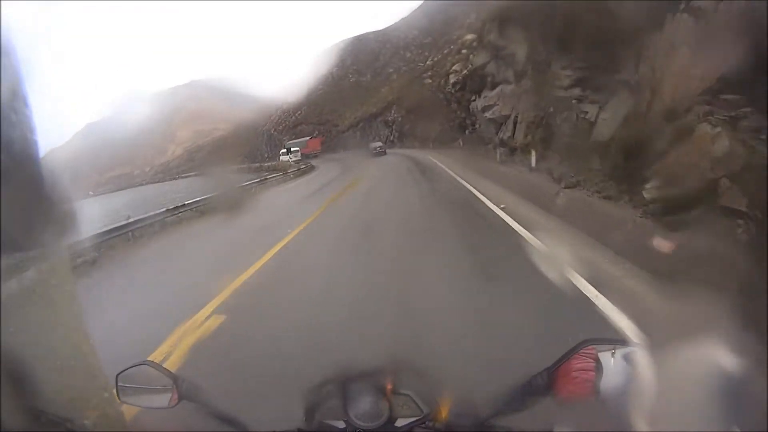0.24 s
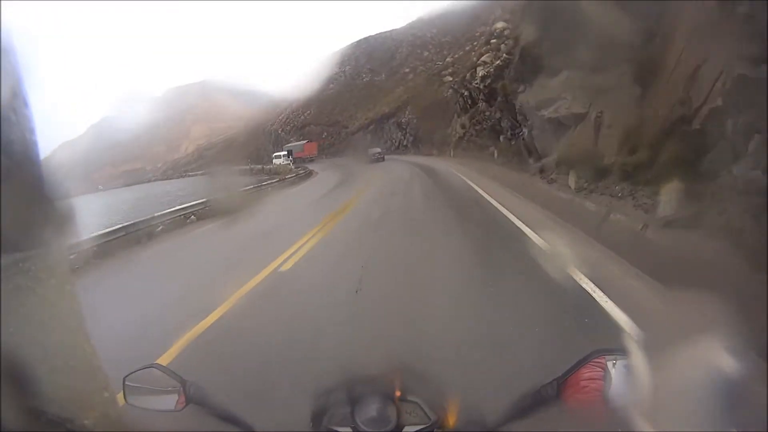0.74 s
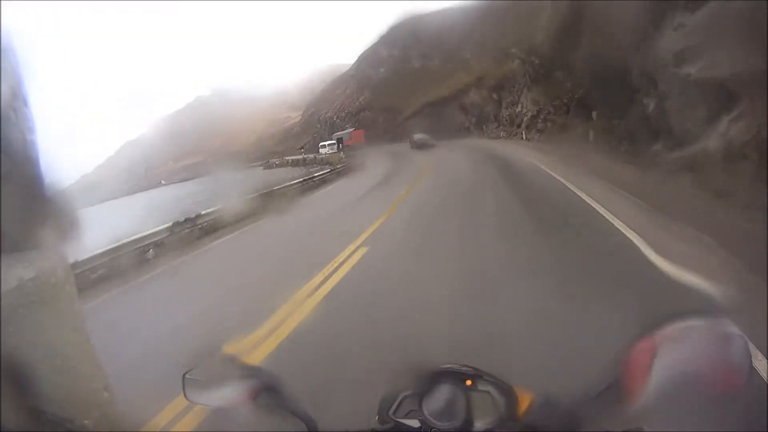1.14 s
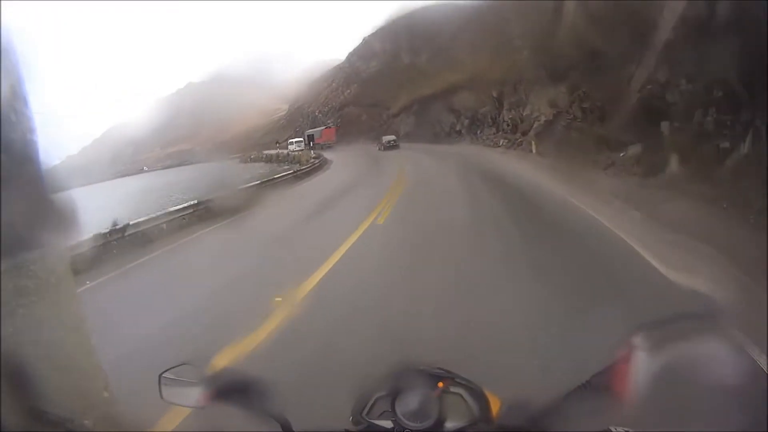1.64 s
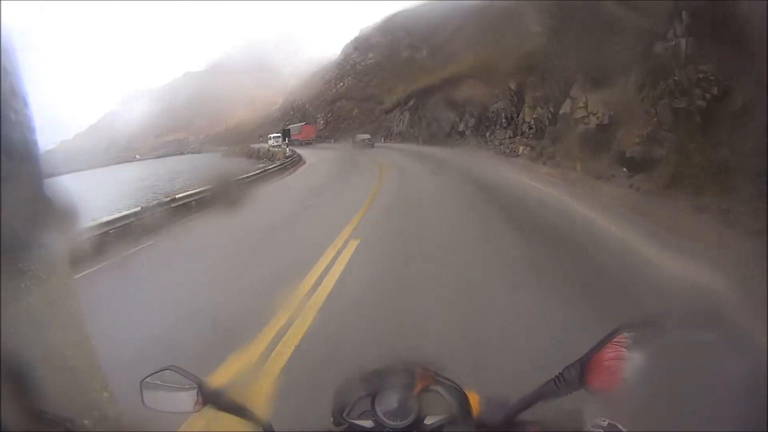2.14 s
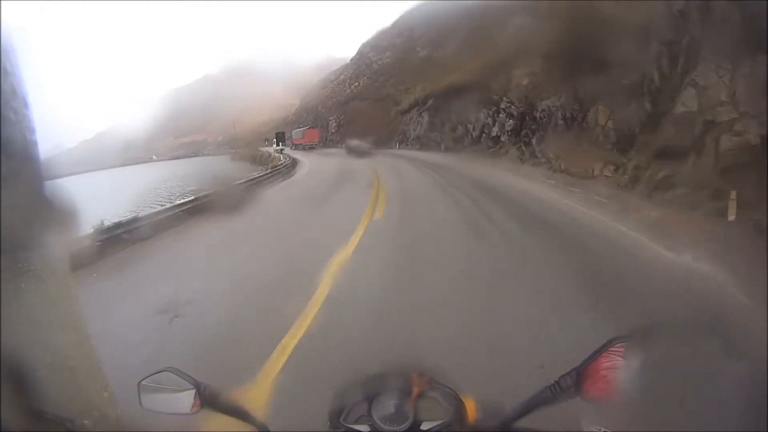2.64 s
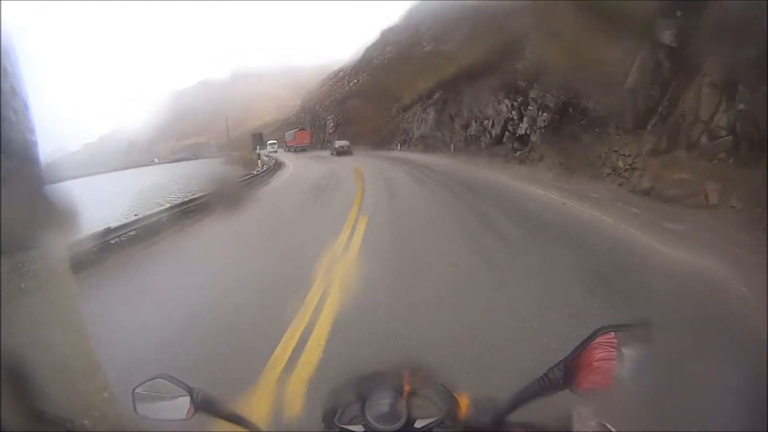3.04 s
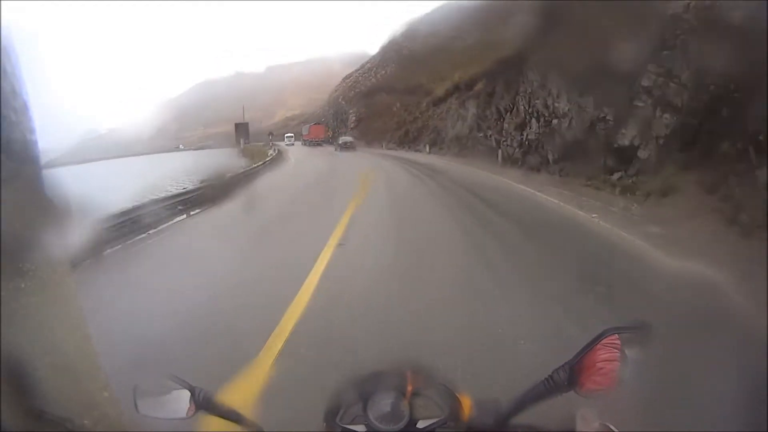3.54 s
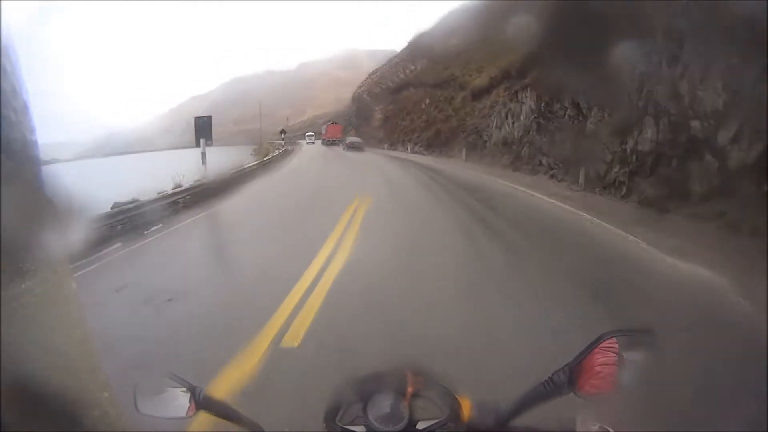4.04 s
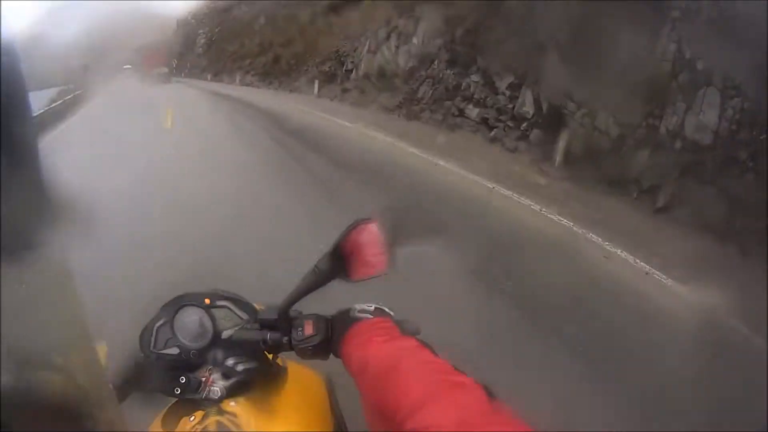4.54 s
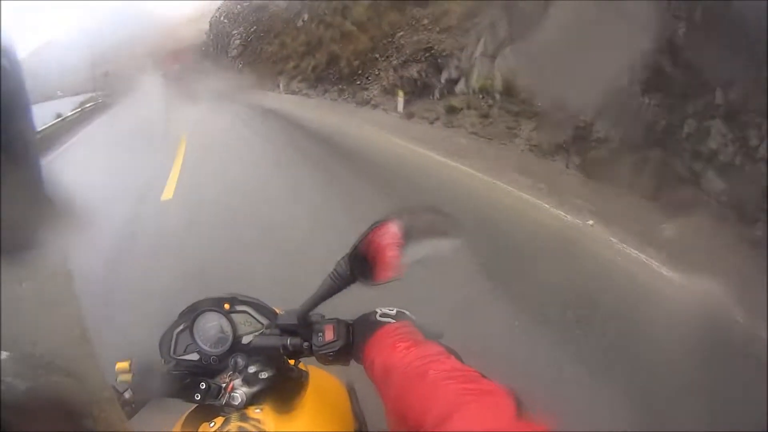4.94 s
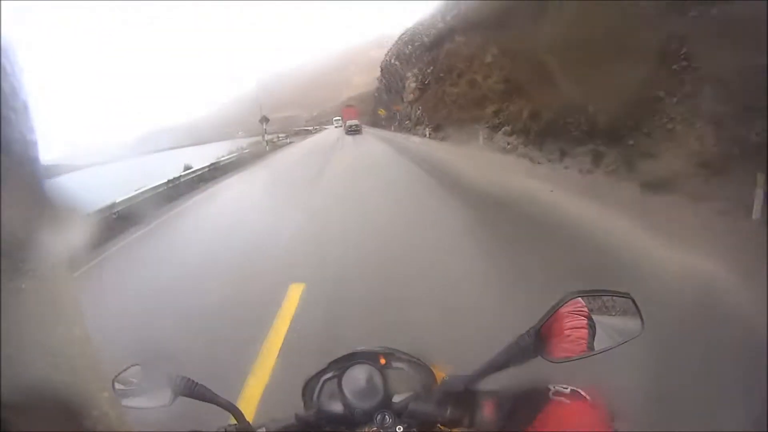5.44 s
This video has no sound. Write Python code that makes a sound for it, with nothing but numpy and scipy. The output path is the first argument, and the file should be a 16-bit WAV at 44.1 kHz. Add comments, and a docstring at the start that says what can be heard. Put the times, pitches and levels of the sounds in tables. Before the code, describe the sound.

Wind and tyre spray hiss on a motorcycle helmet while raindrops tick sharply on it, over thin whistles, low rumble and faint whine.

```python
"""On a motorcycle on a wet road; a small stereo camera sits in a closed housing on the rider's helmet.
From the start, wind and tyre spray hiss through the housing's resonances over a low rumble, air whistles
over its edges, raindrops tick on the shell and gears whine faintly. From 2.2 to 5.1 s the head tips down:
most whistles rise and the whine fades. On the way, the background dips briefly at four hard drops, and
near 4.5 s the moving head meets one buffet of wind. The head stays down to the end."""
import sys
import numpy as np
from scipy import signal
from scipy.fft import rfft, irfft, next_fast_len
from scipy.io import wavfile

SR = 44100
rng = np.random.default_rng(int(sys.argv[2]) if len(sys.argv) > 2 else 0)


def transcribe(u):
    """Save the signal u as a 16-bit wav file named by the first command-line argument.

    u: samples, shape (n,) or (channels, n), limited to [-1, 1]; the rate is SR.
    q: integer samples, one column per channel.
    """
    v = np.clip(np.atleast_2d(u).T, -1, 1)
    q = np.round(v * 32767).astype(np.int16)
    wavfile.write(sys.argv[1], SR, q)


N = 251811
TIME = np.arange(N) / SR
FFT_SIZE = next_fast_len(N)
BIN_HZ = np.arange(FFT_SIZE // 2 + 1) * SR / FFT_SIZE
SIDES = np.array([[.5], [-.5]])   # splits a left-right difference between the two microphone ports

# Airflow at the helmet, before the buffet: t/s, hiss level/dB, rumble level/dB
RIDE = [(0.0, -43, -46.5), (0.32, -43.5, -47.5), (0.68, -44, -46.5), (1.18, -43.5, -50), (2.02, -43, -49),
        (2.26, -44.5, -50), (3.44, -41.5, -49), (4.15, -42.5, -51.5), (4.61, -43, -48.5),
        (4.99, -42.5, -47), (5.36, -42, -46.5), (5.71, -42, -49.5)]
# Spectrum of wind and tyre spray outside the housing: f/Hz, relative level/dB
HISS = [(300, -25), (600, -14.5), (1000, -15), (2000, -16), (3000, -22.5), (5000, -21), (7000, -20.5),
        (9000, -32), (11500, -37)]
# Housing cavities, right around the microphones: f/Hz, width/Hz, left lift/dB, right lift/dB
CAVITY = [(884, 56, 6, 6.9), (1284, 354, 9.5, 8), (1580, 350, 6.5, 2.7), (2331, 336, 17, 9.6),
          (3306, 160, -23, 13.4), (4250, 200, 8, 7.9), (4770, 250, -35, 8.3), (7560, 380, -6, 1.8)]
# Spectrum of the wind's rumble on the housing: f/Hz, relative level/dB
RUMBLE = [(12, -33), (20, -17), (43, -10.5), (135, -0.5), (167, -2.5), (238, -1), (325, -6.5), (370, -10),
          (528, -14.5), (600, -13.5), (780, -23), (1320, -120)]
def wind(buffet_s=4.47, buffet_half_width_s=.1, buffet_hiss_db=2.0, buffet_rumble_db=4.5):
    """Wind and spray hiss through the housing's cavities over a rumble; one buffet lifts both."""
    ride_s, hiss_db, rumble_db = np.transpose(RIDE)
    buffet = np.exp(-((TIME - buffet_s) / buffet_half_width_s) ** 2)
    hiss_gain = from_db(np.interp(TIME, ride_s, hiss_db) + buffet_hiss_db * buffet)
    rumble_gain = from_db(np.interp(TIME, ride_s, rumble_db) + buffet_rumble_db * buffet)
    cavity_db = sum(np.array(db)[:, None] / (1 + (2 * (BIN_HZ - hz) / width) ** 2)
                    for hz, width, *db in CAVITY)
    hiss = gusty_noise(spectrum(HISS) + cavity_db, gust_db=1.1, gust_hz=24.0)
    rumble = gusty_noise(spectrum(RUMBLE), gust_db=-1.6, gust_hz=9.2)
    return hiss_gain * hiss + rumble_gain * rumble


# Whistles at the housing's edges: f head up/Hz, f head down/Hz, width/Hz, level head up/dB,
# level half way/dB, level head down/dB, leftward bias/relative, left lead/rad
WHISTLES = [(2605, 3660, 180, -57, -52, -50, 7.5, -1.72), (3319, 4050, 610, -66, -51.5, -45, 0.5, -1.14),
            (3833, 5400, 170, -55.5, -51, -82.5, 2, -0.91), (4620, 4620, 280, -61, -58, -52, 3, 0.39),
            (5380, 7900, 90, -72, -69, -67, 10, -1.2), (6120, 8300, 69, -65.5, -72, -62.5, 0.5, -0.083),
            (6400, 8700, 970, -75, -73, -63.5, -1, -0.95)]
def whistles():
    """Air whistles over the edges; tilt shifts pitch and level, and the rougher stream adds flutter."""
    down = tilt()
    flutter = 1 + .015 * down * slow_noise(150).real
    out = 0
    for up_hz, down_hz, width_hz, *db, bias, lead in WHISTLES:
        level_db = np.interp(down, [0, .5, 1], db) + 2.7 * slow_noise(17).real
        pan_db = bias * (2.5 - 0.95 * down)   # tipping down brings both ports into the stream
        hz = flutter * (up_hz + (down_hz - up_hz) * down)
        out = out + from_db(level_db + pan_db * SIDES) * noisy_tone(hz, width_hz, lead)
    return out


# Single drops on the shell, at very close range: t/s, level/dB, first ring f/Hz, second ring f/Hz,
# brightness/octaves above 1 kHz, spread/octaves, left minus right/dB
DROPS = [(0.0525, -23.5, 2390, 1640, 1.7, 1.6, -8.5), (0.0712, -25, 2390, 1705, 1, 1.5, -0.5),
         (0.241, -25.5, 2480, 2190, 0.3, 1.5, -2.0), (0.5314, -23.5, 1470, 2510, 0.3, 1.5, -5),
         (0.6233, -27, 1280, 1650, 0.3, 2.1, -3.0), (0.7528, -30.0, 3690, 3410, 2.8, 2.0, -1.5),
         (0.871, -24.5, 5050, 4600, 1.75, 3, -2), (0.9177, -32.0, 2380, 4400, 2.2, 2.0, 0.5),
         (0.9797, -21.5, 2360, 1620, 1.4, 1.23, -4), (1.0747, -17, 1710, 1460, 0.26, 1.7, -4.0),
         (1.451, -26.5, 4160, 4390, 0.7, 2.3, -2.0), (1.5983, -18.5, 3330, 4580, 2.26, 1.1, -8.5),
         (1.633, -25, 1370, 2260, 0.3, 2.3, -5), (1.6403, -24.5, 3770, 2320, 2.4, 1.1, 0),
         (1.6558, -24, 1340, 2340, 0.6, 1.9, -4), (1.8589, -23, 4380, 3760, 1.6, 2.6, -3.5),
         (2.161, -22.5, 1350, 2290, 0.65, 1.4, -3.0), (2.1704, -27.5, 1360, 2400, 0.6, 2.6, -2.0),
         (2.2475, -15, 1750, 2500, 0.33, 1.63, -4), (2.2685, -18.5, 2570, 3940, 1.86, 1.06, 6),
         (2.6254, -20, 2470, 1640, 0.58, 1.76, -4), (2.667, -26.5, 2290, 1380, 1.75, 1.3, -3),
         (2.7161, -17, 2540, 1686, 0.3, 1.93, -4), (2.761, -29, 4650, 4870, 2.1, 2.0, 0.0),
         (2.905, -28, 2430, 1870, 1.8, 1.5, -3.0), (2.9354, -29.5, 1260, 1970, 1.7, 2.5, -3.0),
         (2.951, -17.5, 6400, 5530, 2.9, 1.4, 6), (3.0092, -23.5, 2460, 3830, 1.44, 1.9, -6.0),
         (3.0994, -27.5, 1710, 4230, 2.9, 1.4, -1.5), (3.1203, -32.0, 2490, 2100, 2.4, 2.0, 5),
         (3.129, -18, 1550, 2250, 0.28, 1.7, -6), (3.1403, -26.5, 3950, 4270, 0.3, 2.6, -2),
         (3.214, -22.5, 2450, 1500, 0.6, 2.3, -4), (3.2212, -22.5, 2480, 1320, 0.3, 2.1, -1.5),
         (3.2292, -30, 2960, 1280, 3.2, 3, -1.5), (3.2675, -21, 3340, 4410, 1.2, 1.04, 1),
         (3.4106, -29.5, 1390, 2320, 3.2, 3.6, 0), (3.4243, -26, 1750, 1500, 0.3, 2.4, -8),
         (3.486, -29.0, 4550, 3660, 2, 1.2, 6), (3.5696, -27, 2430, 1340, 1.3, 1.7, -2),
         (3.58, -27.5, 3690, 3000, 0.45, 2.9, -3.5), (3.593, -26.5, 4070, 4280, 1.25, 1.2, -5.5),
         (3.633, -28.5, 1400, 1700, 0.6, 2, -3), (3.6576, -22.5, 2810, 2150, 2.2, 1.7, -2.5),
         (3.684, -28, 2450, 3340, 2.1, 2.0, -8), (3.793, -28, 2350, 1690, 1, 1.2, -7),
         (3.847, -27.5, 3940, 4320, 1.45, 1, -2.0), (3.855, -19.5, 1480, 2240, 0.4, 1.7, -3),
         (3.876, -33, 2400, 3380, 1.65, 1.3, -11), (3.886, -23, 1440, 4800, 0.3, 2.9, -2),
         (3.9125, -19, 4580, 6600, 2.9, 1.1, 5), (3.9393, -14, 4070, 4200, 1.48, 0.83, -6.0),
         (3.9744, -21.5, 1510, 1665, 0.33, 2.2, -6), (4.0432, -19, 1474, 1740, 0.37, 1.5, -1.5),
         (4.0612, -32.5, 2410, 3120, 2.1, 1.8, -4.0), (4.3841, -24.0, 3000, 4540, 1.2, 2.1, -4.5),
         (4.432, -26, 837, 1500, 0.1, 1.8, -2), (4.459, -23.5, 1600, 1230, 0.3, 0.93, -4),
         (4.4758, -30, 3800, 2580, 1.4, 2.0, 0.5), (4.5087, -30, 1610, 3800, 0.8, 1.8, 0),
         (4.5416, -25, 4830, 2600, 1.4, 2.2, -1.5), (4.6482, -26, 3640, 1790, 3.3, 2.4, -1.0),
         (4.73, -25.5, 3540, 2360, 3.6, 1.7, 5), (4.8256, -21.5, 1400, 1690, 1, 2.4, -5),
         (4.8915, -18.5, 1480, 1226, 0.73, 1.6, -1), (4.899, -27, 2730, 1570, 1.05, 2.0, 1.5),
         (4.9043, -20.5, 1360, 3560, 0.89, 2.3, 0.5), (4.914, -15.5, 2620, 4600, 0.4, 2.1, 2.0),
         (4.9187, -17.5, 3500, 2560, 0.82, 1.9, -1.0), (4.9217, -16.5, 1355, 3400, 0.3, 1.7, -3),
         (4.933, -35, 1360, 1600, 0.6, 1.8, 9), (4.9437, -16.5, 3320, 2280, 1.85, 0.83, -9.5),
         (4.9883, -30, 4700, 1500, 1.5, 1.8, 0), (5.021, -24, 1620, 4240, 0.45, 1.4, -2),
         (5.0396, -23, 3630, 3980, 2.5, 0.89, 6), (5.107, -28, 3620, 4260, 1.9, 2.6, -2.5),
         (5.1724, -28.5, 3420, 4340, 3, 3, -0.5), (5.2432, -29, 1750, 1480, 0.4, 1.9, -6),
         (5.2742, -16, 1640, 1440, 0.85, 1.8, -3), (5.2862, -24, 1340, 2510, 2.2, 1.8, -2.5),
         (5.3272, -24.5, 1325, 1660, 0.3, 2.5, -3.5)]
def rain(snap_db=-8.5, snap_db_per_octave=3.5):
    """Each impact snaps, sharper for bright drops, and rings the shell; its spot sets colour and side."""
    s, level_db, first_hz, second_hz, bright, spread, pan_db = np.transpose(DROPS)
    at = np.round(s * SR).astype(int)
    port_db = level_db + pan_db * SIDES

    def strike_db(hz):
        """Each drop's strength at a pitch: 9 dB less one spread away from its brightest."""
        return port_db - 9 * ((np.log2(hz / 1000) - bright) / spread) ** 2

    ringing = shell(at, strike_db, first_hz, second_hz)
    ringing += plinks(at, strike_db, first_hz) + plinks(at, strike_db, second_hz)
    ringing = highpass(ringing, order=4, hz=750)   # small drops cannot move the whole housing
    ringing = filtered(ringing, np.exp(1j * spectrum(LEAD) * SIDES))
    impacts = np.zeros((2, N))
    impacts[:, at] = from_db(port_db + snap_db + snap_db_per_octave * bright)
    return ringing + highpass(impacts, order=2, hz=6100)


# Modes of the shell, next to the microphones: f/Hz, relative level/dB, t60/s
SHELL = [(792, -19.5, 0.019), (1398, -9, 0.013), (1790, -12, 0.02), (2076, -10, 0.016), (2425, -11, 0.018),
         (2678, -10.5, 0.017), (3136, -11, 0.016), (3530, -13, 0.021), (3925, -5.5, 0.0073),
         (4540, -7, 0.011), (5050, -6.5, 0.0088), (5760, -8.5, 0.0071), (6490, -13.5, 0.02),
         (7400, -9, 0.006), (8900, -16, 0.011), (9600, -19, 0.0078)]
def shell(at, strike_db, first_hz, second_hz, ring_lift_db=7.5, drizzle_per_s=30, drizzle_db=-37):
    """Drops and fine drizzle strike every mode; those near a drop's two ring pitches sound louder."""
    chance = rng.standard_normal((len(at), len(SHELL), 3))
    drizzle = rng.random(N) < drizzle_per_s * from_db(3.0 * slow_noise(3).real) / SR
    count = drizzle.sum()
    sizes = from_db(drizzle_db + 2.5 * np.minimum(rng.exponential(1, count), 2))
    out = np.zeros((2, N))
    for k, (hz, db, t60) in enumerate(SHELL):
        clicks = np.zeros((2, N))
        dull = from_db(db - 5.5 * np.log2(hz / 2000))   # drizzle loses 5.5 dB an octave
        clicks[:, drizzle] = sizes * dull * (rng.standard_normal(count) + rng.standard_normal((2, count)))
        detuning = np.minimum(np.abs(np.log(hz / first_hz)), np.abs(np.log(hz / second_hz)))
        near_db = ring_lift_db * np.exp(-(detuning / .065) ** 2)
        uneven_db = chance[:, k, 0] + 2 * chance[:, k, 1:].T   # a shared part plus each port's own
        clicks[:, at] = from_db(strike_db(hz) + db + near_db + uneven_db) * (-1) ** k
        out += ring(clicks, hz, t60)
    return out


def plinks(at, strike_db, hz, gain_db=-9, cycles_to_fade=58, rise_s=.0012):
    """Each drop rings on at a pitch of its own, a sine that swells quickly and dies away."""
    after = np.arange(SR // 25)[:, None]
    cycles = hz * after / SR
    envelope = from_db(gain_db - 60 * cycles / cycles_to_fade) * (1 - np.exp(-after / SR / rise_s))
    plink = envelope * np.sin(2 * np.pi * cycles)
    out = np.zeros((2, N))
    for port, db in zip(out, strike_db(hz)):
        np.add.at(port, at + after, plink * from_db(db))
    return out


# Engine and gear tones from below the rider: f/Hz, level/dB
WHINE = [(143, -68), (1257, -56), (1330, -54), (1366, -54), (1473, -62.5)]
def whine(width_hz=9.5):
    """Engine and gear teeth at steady speed, each tone wavering slightly."""
    tones = sum(from_db(db) * noisy_tone(np.full(N, hz), width_hz)[0] for hz, db in WHINE)
    shade = from_db(-7.0 * tilt())   # the tipped helmet shades the ports
    return shade * ports(tones, [tones, tones])


# Dips in the background at hard drops: t/s, depth/dB, recovery/s
DIPS = [(2.269, 8, 0.027), (2.95, 6, 0.021), (3.912, 20, 0.014), (4.94, 7, 0.052)]
def dips():
    """A gain that falls suddenly and recovers steadily."""
    depth_db = sum(db * np.interp(TIME - s, [-.002, 0, back / 2, back], [0, 1, 0.42, 0.0088])
                   for s, db, back in DIPS)
    return from_db(-depth_db)


def tilt(start_s=2.2, end_s=5.1):
    """The head tips in one smooth nod, from upright (0) to fully down (1)."""
    part = np.clip((TIME - start_s) / (end_s - start_s), 0, 1)
    return part ** 2 * (3 - 2 * part)


# Likeness of the two microphone ports: f/Hz, shared part of the power/0-1
LIKENESS = [(60, 0.98), (170, 1), (450, 0.74), (900, 0.83), (1400, 0.79), (1900, 0.77), (2300, 1),
            (2650, 0.33), (3300, 1), (3650, 0.085), (4300, 0.98), (5200, 0.24), (6500, 1), (10500, 0.98)]
# Balance between the ports: f/Hz, left minus right/dB
BALANCE_DB = [(130, 0), (300, -0.5), (700, -2.5), (1400, -5.5), (2600, -10), (5500, 2), (11000, -0.5)]
# Phase between the ports: f/Hz, left lead/rad
LEAD = [(40, -0.38), (170, -0.31), (500, -1.31), (900, -1.32), (1400, -1.03), (1900, 1.86), (2240, 1.34),
        (2900, 1.7), (3350, -0.62), (3900, -0.94), (4700, 1.3), (6500, -1.43), (9500, -0.46)]
def ports(shared, own):
    """Part of the sound reaches both ports, part each alone; the sides differ in level and phase."""
    alike = spectrum(LIKENESS)
    sides = from_db(spectrum(BALANCE_DB) * SIDES) * np.exp(1j * spectrum(LEAD) * SIDES)
    return filtered(shared, np.sqrt(alike) * sides) + filtered(own, np.sqrt(1 - alike) * sides)


def gusty_noise(spectrum_db, gust_db, gust_hz):
    """Coloured noise with a wavering level at both ports; rms 1."""
    white = rng.standard_normal((3, N)) * from_db(gust_db * slow_noise(gust_hz).real)
    return rms_one(filtered(ports(white[0], white[1:]), from_db(spectrum_db)))


def noisy_tone(hz, width_hz, lead=0):
    """A narrow band of noise on a pitch curve, the left port leading in phase; rms 1."""
    tone = slow_noise(width_hz) * np.exp(2j * np.pi * np.cumsum(hz) / SR)
    return np.sqrt(2) * (tone * np.exp(1j * lead * SIDES)).real


def slow_noise(width_hz):
    """Complex noise twice through a one-pole low-pass; rms 1."""
    r = np.exp(-2 * np.pi * width_hz / SR)
    white = rng.standard_normal(N + SR) + 1j * rng.standard_normal(N + SR)
    return rms_one(signal.lfilter([1], [1, -2 * r, r * r], white)[SR:])


def ring(clicks, hz, t60):
    """A unit click sets a sine of height 1 ringing."""
    r, w = from_db(-60 / (t60 * SR)), 2 * np.pi * hz / SR
    return signal.lfilter([0, np.sin(w)], [1, -2 * r * np.cos(w), r * r], clicks + 1e-18)


def highpass(x, order, hz):
    """Cut the lows."""
    return signal.sosfilt(signal.butter(order, hz, "high", fs=SR, output="sos"), x + 1e-18)


def filtered(x, gain):
    """Apply a gain per frequency bin, giving two channels."""
    return irfft(rfft(x, FFT_SIZE) * gain, FFT_SIZE)[:, :N]


def spectrum(points):
    """Read (f/Hz, value) points at every bin, on a log axis."""
    hz, value = np.transpose(points)
    return np.interp(np.log(BIN_HZ + 1), np.log(hz + 1), value)


def from_db(db):
    """Decibels to gain."""
    return 10 ** (np.asarray(db) / 20)


def rms_one(x):
    """Scale to rms 1."""
    return x / np.sqrt(np.mean(np.abs(x) ** 2) + 1e-20)


def scene():
    """At the helmet: wind, whistles and whine dip together, with the rain on top."""
    return (wind() + whistles() + whine()) * dips() + rain()


def record(dry):
    """In the camera, peaks are rounded and the treble ends in two steps."""
    rounded = .45 * np.tanh(dry / .45)
    shelved = signal.sosfilt(signal.cheby2(20, 20, 11150, fs=SR, output="sos"), rounded)
    return signal.sosfilt(signal.cheby2(12, 60, 12355, fs=SR, output="sos"), shelved)


dry = scene()
out = record(dry)
transcribe(out)
```